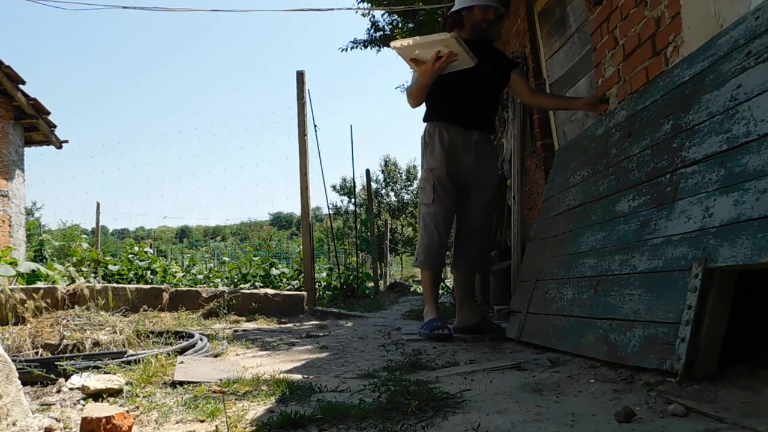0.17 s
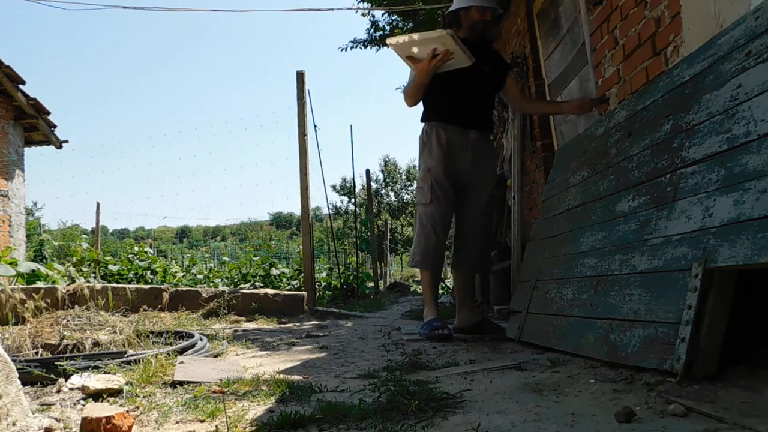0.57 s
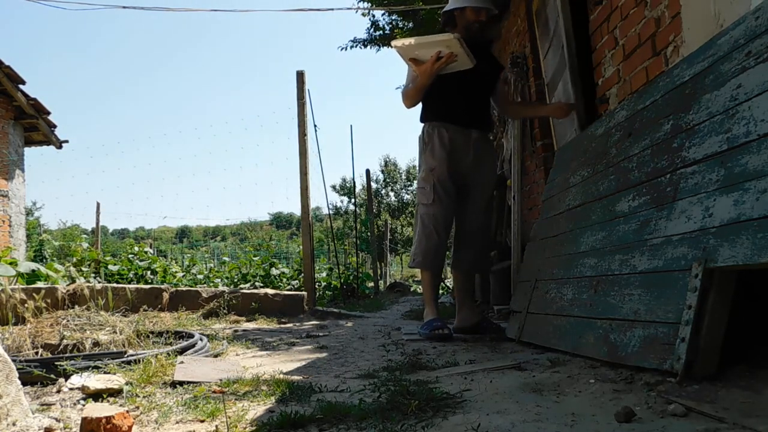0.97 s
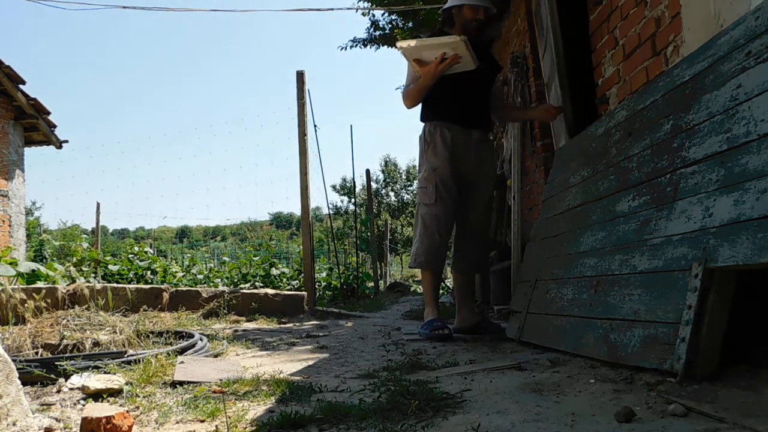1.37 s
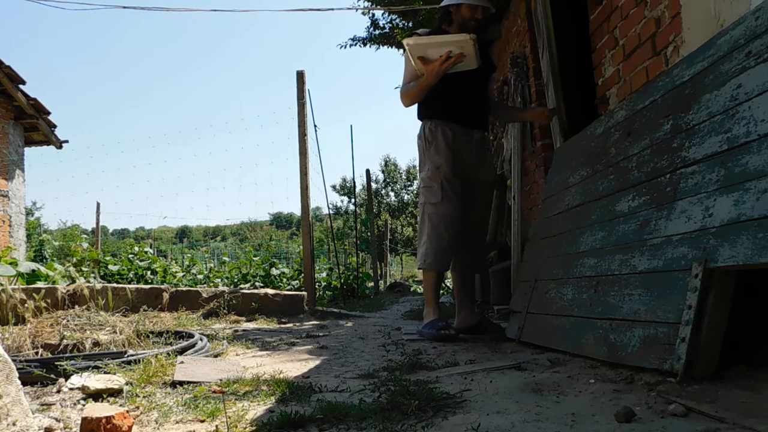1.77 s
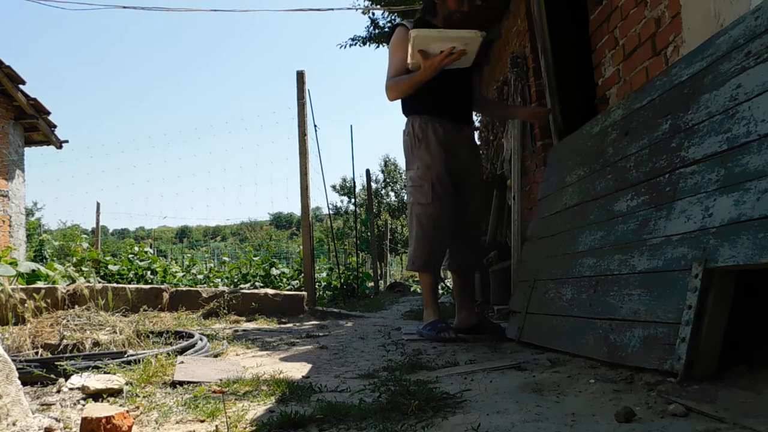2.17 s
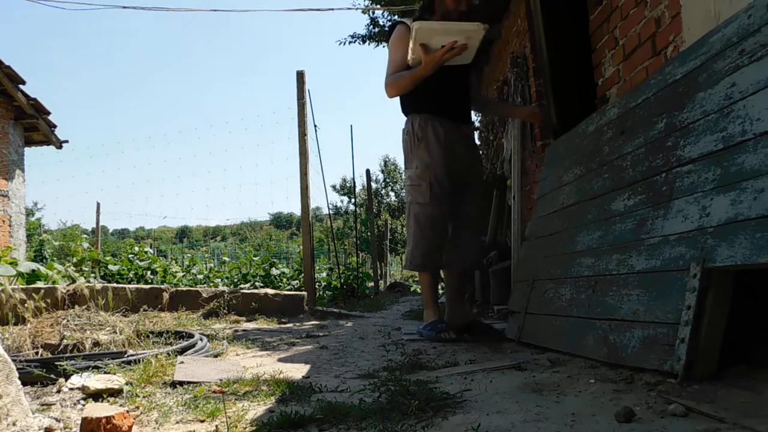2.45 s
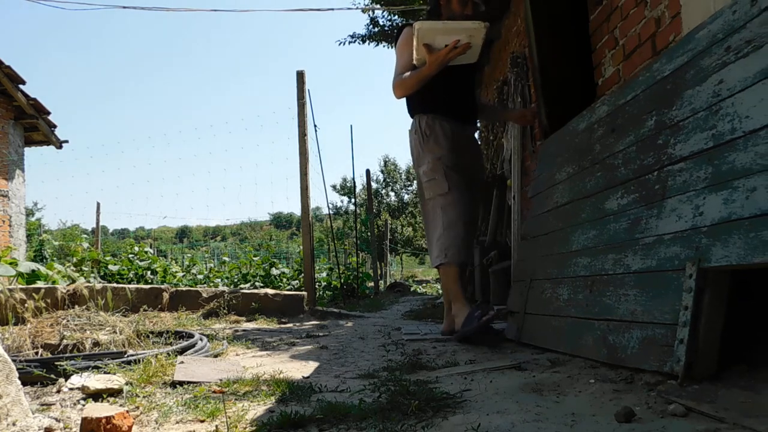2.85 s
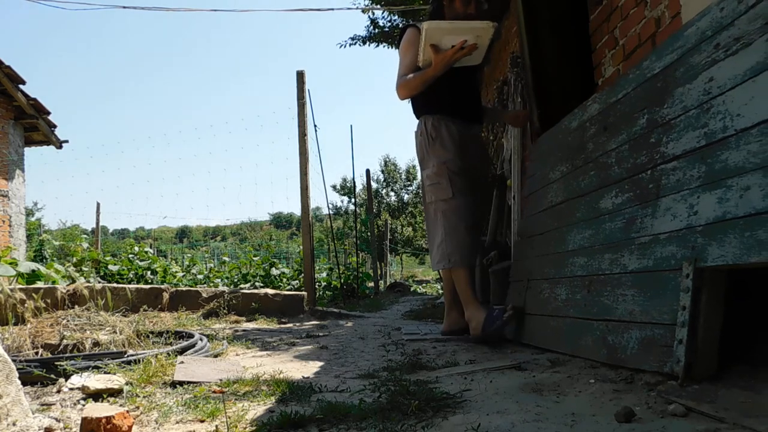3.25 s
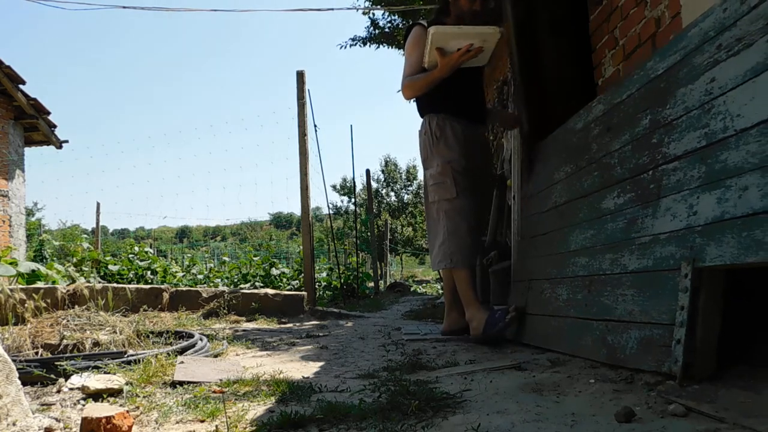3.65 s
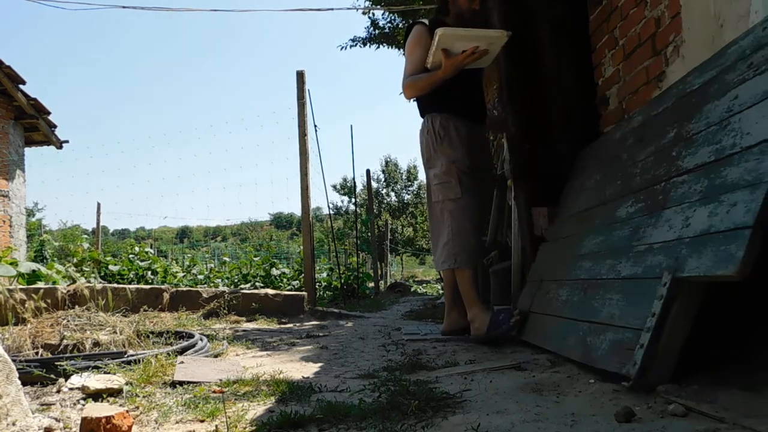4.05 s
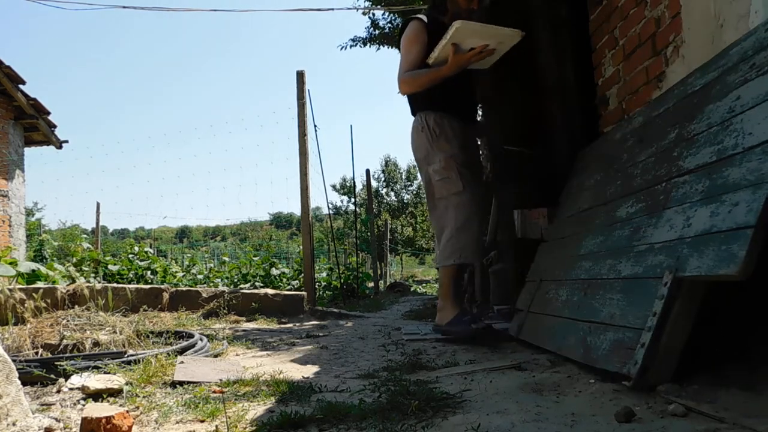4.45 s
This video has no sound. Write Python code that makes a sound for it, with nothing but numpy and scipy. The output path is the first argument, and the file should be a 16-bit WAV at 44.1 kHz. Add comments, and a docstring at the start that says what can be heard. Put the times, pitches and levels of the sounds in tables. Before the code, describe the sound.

Small wooden and metal ticks from a shed door latch, with short squeaks, under thin high cicadas; then a plank panel knocks loudly and clatters to rest.

```python
"""Small ticks of a shed door's latch and hinge, worked by a hand a few metres off, under very high cicadas;
two dull low thuds, perhaps footsteps, fall among the first. Then a leaning plank panel is dragged, knocked and
bounces to rest. Impact bursts drive plank and latch modes; squeaks are gliding tones; rubbing and brushes are
filtered grit. Cicadas are noise patterns repeated every stroke. A soft noise hush lies under all, and the yard
returns a short, dull tail of the near sounds.
"""
import sys
import numpy as np
from scipy import signal
from scipy.fft import rfft, irfft, next_fast_len
from scipy.io import wavfile
from scipy.ndimage import uniform_filter1d

SR = 44100
rng = np.random.default_rng(int(sys.argv[2]) if len(sys.argv) > 2 else 0)


def store_pcm(level_fs):
    """Save levels as 16-bit WAV."""
    pcm = np.round(np.clip(level_fs, -1, 1) * 32767).astype(np.int16)
    wavfile.write(sys.argv[1], SR, np.atleast_2d(pcm).T)


N = 202605
T = np.arange(N) / SR
SIZE = next_fast_len(N + SR // 2)  # room for the yard tail


def grid(size):
    """FFT bin frequencies in Hz, nudged off zero for safe division and logs."""
    return np.fft.rfftfreq(size, 1 / SR) + 1e-3


HZ = grid(SIZE)


def undb(db):
    """Decibels to gain."""
    return 10 ** (np.asarray(db) / 20)


def unit(x):
    """Scale to rms 1."""
    return x / np.sqrt(np.mean(x ** 2))


def through(x, response):
    """Filter by a frequency response given on HZ."""
    return irfft(rfft(x, SIZE) * response, SIZE)[..., :N]


def colour(points, at=HZ):
    """Gain from (Hz, dB) points, interpolated over log frequency."""
    hz, db = np.transpose(points)
    return undb(np.interp(np.log(at), np.log(hz), db))


def modes(table, hz=HZ):
    """Causal response of resonances (Hz, width Hz, dB) with alternating sign."""
    total = 0
    for k, (f, width, db) in enumerate(table):
        resonance = 1j * hz * width / (f * f - hz * hz + 1j * hz * width)
        total = total + (-1) ** k * undb(db) * resonance
    return total


def curve(rows, off_db=-120):
    """Gain from (s, dB) rows, practically silent outside them."""
    s, db = np.transpose(rows)
    return undb(np.interp(T, s, db, left=off_db, right=off_db))


def walk(rate_hz):
    """Random levels, a new one every 1 / rate_hz s, joined by ramps; spread near 1."""
    k = int(SR / rate_hz)
    steps = np.repeat(rng.standard_normal(N // k + 1), k)
    return 1.2 * uniform_filter1d(steps, k)[:N]


def grit(shape, scatter_db):
    """Noise whose samples differ widely in size, like many tiny impacts."""
    return rng.standard_normal(shape) * undb(scatter_db * rng.exponential(size=shape))


def pan(db):
    """Left and right gains, db apart (left minus right)."""
    return undb([[db / 2], [-db / 2]])


def add(out, s, sound, db, pan_db=0.):
    """Lay a short sound into the stereo track; level is twice its loudest 3 ms rms."""
    i = int(s * SR)
    sound = sound[..., :N - i]
    peak = np.sqrt(4 * uniform_filter1d(sound ** 2, size=130).max())
    out[:, i:i + sound.shape[-1]] += sound * undb(db) / peak * pan(pan_db)


def burst(hits, rise_s, length_s, first_db):
    """Spectrum of a run of small impacts that swells and dies, with one sharp impact 1 ms in."""
    t = np.arange(len(hits)) / SR
    push = hits * (1 - np.exp(-t / max(rise_s, 1e-4))) ** 2 * np.exp(-t / max(length_s, 2e-4))
    push = push / np.sqrt(np.sum(push ** 2))
    push[44] += undb(first_db)
    return rfft(push)


# Two dull low thuds, perhaps footsteps, then blows on the planks. Each row: time in seconds, level in dB,
# centre of the modes reached in Hz, contact rise in seconds, crack in dB, low flex in dB.
IMPACTS = [(.19, -51.5, 148, 0.021, -55, -28), (.248, -69, 160, 0.0089, -58, -24),
           (3.473, -43.5, 880, 0.0043, -34, -3), (3.5, -34.5, 930, 0.0073, -18, 2.5),
           (3.53, -27, 880, 0.0014, -44, -10.5), (3.552, -32.5, 940, 0.0013, -24, -4),
           (3.597, -27, 1880, 0.0012, -14, -16), (3.604, -30.5, 650, 0.002, -17.5, -8),
           (3.82, -12.5, 1000, 0.0024, -28.5, 1.5), (3.835, -9.5, 786, 0.0016, -33, -5),
           (3.855, -21.5, 640, 0.0054, -20.5, -14), (3.866, -15, 1030, 0.0009, -42, 0.5),
           (3.873, -23.5, 756, 0.0024, -25.5, -15), (3.954, -31.5, 1260, 0.014, 9, -17),
           (3.971, -11.5, 1435, 0.00064, -25, -17), (3.986, -30, 1310, 0.0013, 3, -8),
           (4.006, -23.5, 865, 0.0047, -26, -8), (4.028, -27.5, 920, 0.0045, -14.5, 10),
           (4.099, -34.5, 2520, 0.0019, 11, 1), (4.11, -25, 770, 0.0034, -26, 1),
           (4.134, -26.5, 720, 0.0014, -45, 2.5), (4.15, -39, 254, 0.0074, -68.5, -8),
           (4.16, -50, 530, 0.0069, -9, 5), (4.189, -30, 760, 0.0016, -27, 1.5),
           (4.221, -55, 293, .008, -45, 0), (4.276, -37, 764, 0.0036, -33, 4.5),
           (4.327, -63, 235, 0.0051, -54, -10)]
# Plank modes. Each row: frequency in Hz, width in Hz, strength in dB.
PANEL = [(170.2, 37, -11), (218, 26, -3.5), (257, 80, -3), (312, 37, 1), (344, 32, -3.5), (463, 51, 5.5),
         (552.5, 27, 7.5), (565, 54, 6.5), (647, 72, 5.5), (711, 54, 1), (819, 64, 1.5), (924, 49, -0.5),
         (944, 68, 1), (958, 150, 2), (1126, 63, 4), (1151, 81, 2), (1310, 89, 0.5), (1400, 76, 0.5),
         (1555, 130, 5), (1633, 160, 6), (1890, 470, -4.5), (1986, 46, 2), (2310, 470, -5.5),
         (2730, 120, 1), (2830, 1070, -10), (3650, 120, 1.5), (3940, 170, -8)]
# Splintering, also the rubbing hiss. Each row: frequency in Hz, gain in dB.
CRACK = [(300, -62), (1500, -10), (3000, 0.5), (4000, -0.5), (5000, -7), (7000, -7.5), (9000, -14),
         (11500, -18.5), (14000, -21), (17000, -14)]
SPOT_DB = 1.5  # scatter of mode strength from one struck spot to the next
FLEX_HZ = 380  # the whole panel flexes below this
JUDDER_S, JUDDER_PER_RISE = 0.0019, 2.56  # a softer contact judders longer
FIRST_DB, FIRST_DB_PER_S = -1, -2200.  # and its first impact is weaker


def thuds_and_panel():
    """Each impact judders through the plank modes; its spot and hardness choose which answer."""
    out, hz = np.zeros((2, N)), grid(8192)
    crack = colour(CRACK, hz)
    spots = SPOT_DB * rng.standard_normal((len(IMPACTS), len(PANEL)))
    all_hits = grit((len(IMPACTS), 3, 8192), 4.72)
    for (s, db, centre_hz, rise_s, crack_db, flex_db), spot, hits in zip(IMPACTS, spots, all_hits):
        length_s = JUDDER_S + JUDDER_PER_RISE * rise_s
        first_db = FIRST_DB + FIRST_DB_PER_S * rise_s
        wood, left, right = (burst(h, rise_s, length_s, first_db) for h in hits)
        planks = modes([(f, w, gain_db + d) for (f, w, gain_db), d in zip(PANEL, spot)], hz)
        reach = modes([(centre_hz, 0.78 * centre_hz, 0)], hz) ** 2
        flex = undb(flex_db) / (1 + 1j * hz / FLEX_HZ) ** 2
        body = planks * (reach + undb(-16.0) + flex)
        # splinters and grit crack all along the edge, so each ear hears its own
        splinters = undb(crack_db) * crack * np.array([left, right])
        add(out, s - .001, irfft(wood * body + splinters), db, 1.)
    return out


FAINT_TICKS = 12  # count
FAINT_DB, FAINT_SPREAD_DB, FAINT_HZ, FAINT_SNAP_DB = -45, 2., 1140, -3


def faint_ticks():
    """Rows like TICKS at chance moments, thickest where there is rubbing."""
    busy = np.cumsum(np.minimum(sum(curve(rows) for rows in RUB), undb(-61.5)))
    when, size, pitch = rng.random((FAINT_TICKS, 3)).T
    s = np.interp(when, busy / busy[-1], T)
    db = FAINT_DB + FAINT_SPREAD_DB * (2 * size - 1)
    ring_hz = FAINT_HZ * 2 ** (pitch - .4)
    return [(a, b, c, FAINT_SNAP_DB) for a, b, c in zip(s, db, ring_hz)]


# Latch and door ticks that stand out. Each row: time in seconds, level in dB, ring in Hz, snap in dB.
TICKS = [(0.028, -35.5, 1890, -31), (0.03, -29, 840, -10), (0.174, -43, 940, -14), (0.217, -45.5, 895, -21),
         (0.231, -35, 2160, -26), (0.375, -41, 1830, -28), (0.395, -41, 2150, -23),
         (0.652, -39, 1880, -12.5), (0.692, -38.5, 6450, 0), (0.732, -40.5, 1000, -9),
         (0.899, -45.5, 890, -24), (0.931, -30.5, 5170, 1), (1.641, -34.5, 1060, -7),
         (1.726, -36.5, 2400, -10), (1.73, -40, 1190, -24), (1.753, -29, 2400, 12), (1.819, -43, 1400, -17),
         (1.879, -42.5, 1300, -23), (1.964, -41, 1170, -21), (2.103, -36.5, 2050, -18),
         (2.167, -29, 3050, 2), (2.193, -32.5, 1440, -8.5), (2.22, -33, 1240, -39), (2.275, -43, 1290, -13),
         (2.394, -23.5, 2600, -10.5), (2.4, -25.5, 1440, -5), (2.643, -39, 2880, -2),
         (2.841, -43, 2820, -18), (3.03, -45, 1550, -29), (4.187, -52, 8000, -8), (4.276, -51, 9500, -2),
         (4.317, -56, 9500, -20), (4.425, -46, 9000, 0), (4.447, -53, 9500, -25), (4.482, -44.5, 8400, -10),
         (4.503, -48, 8950, -22), (4.522, -49, 6200, -20), (4.559, -55, 10000, -15)]
# Tick edge. Each row: frequency in Hz, gain in dB.
SNAP = [(300, -28), (1200, -14.5), (2500, -2.5), (4000, -1), (6000, 1), (8500, -21.5), (12000, -31),
        (17000, -37)]
# Clinks of the iron latch. Each row: time in seconds, level in dB.
CLINKS = [(0.45, -41.5), (0.4726, -20), (0.492, -36)]
# Latch modes. Each row: frequency in Hz, width in Hz, strength in dB.
LATCH = [(2084, 160, 5), (2313, 9.8, 3.5), (3400, 1400, -14), (5100, 610, -2.5), (7200, 330, -13)]
TICK_RISE_S, TICK_CYCLES, TICK_FIRST_DB = 0.00089, 13, -6  # rattle decays over this many ring cycles
SNAP_RISE_S, SNAP_S, SNAP_FIRST_DB = .0004, .0013, 0.  # the snap is over sooner than the ring
CLINK_RISE_S, CLINK_S, CLINK_FIRST_DB = 0.0049, 0.0027, -23.0
TICK_PAN_DB = -1


def ticks():
    """Impacts excite the part's own ring and a broad snap; the latch rings in its own modes."""
    out, hz = np.zeros((2, N)), grid(4096)
    rows = TICKS + faint_ticks()
    for (s, db, ring_hz, snap_db), hits in zip(rows, grit((len(rows), 4096), 3.94)):
        rattle = burst(hits, TICK_RISE_S, TICK_CYCLES / ring_hz, TICK_FIRST_DB)
        ring = rattle * modes([(ring_hz, 0.9 * ring_hz, 0)], hz) ** 2
        snap = burst(hits, SNAP_RISE_S, SNAP_S, SNAP_FIRST_DB) * colour(SNAP, hz)
        add(out, s - .001, irfft(ring + undb(snap_db) * snap), db, TICK_PAN_DB)
    latch = modes(LATCH, grid(16384))
    for (s, db), hits in zip(CLINKS, grit((len(CLINKS), 16384), 2.)):
        clink = burst(hits, CLINK_RISE_S, CLINK_S, CLINK_FIRST_DB) * latch
        add(out, s - .001, irfft(clink), db, -1.)
    return out


# Hinge and wood squeaks, the first followed by its faint ringing echo. Each row: start in seconds,
# length in seconds, start in Hz, end in Hz, level in dB, third harmonic in dB, roughness 0-1.
SQUEAKS = [(0.613, 0.02, 3430, 3510, -18, -44, 0.09), (.63, 0.1, 3500, 3485, -49.5, -55, 0.8),
           (2.036, 0.053, 2580, 1994, -33.5, -40, 0.9), (2.042, 0.026, 3230, 3090, -41.5, -38, 0.7),
           (2.063, 0.045, 2225, 2236, -44, -40, 0.3), (3.685, 0.015, 1178, 1267, -31.5, -7, 0.39),
           (4.326, 0.014, 1506, 1460, -39.5, -35, 0.3)]
SECOND_DB = -23.5  # second harmonic


def squeaks():
    """Fast stick-slip, and one faint echo: a short gliding tone with overtones, swelling and dying."""
    out = np.zeros((2, N))
    noises = rng.standard_normal((len(SQUEAKS), 8192))
    for (s, length_s, hz0, hz1, db, third_db, rough), noise in zip(SQUEAKS, noises):
        u = np.linspace(0, 1, int(length_s * SR))
        phase = 2 * np.pi * np.cumsum(hz0 + (hz1 - hz0) * u) / SR
        tone = np.sin(phase) + undb(SECOND_DB) * np.sin(2 * phase) + undb(third_db) * np.sin(3 * phase)
        slip = 1 + rough * unit(uniform_filter1d(noise, size=60))[:len(u)]
        swell = np.sin(np.pi * u ** 1.18) ** 0.77
        add(out, s, tone * slip * swell, db, -.5)
    return out


# Rubbing of door, panel and feet, in three bouts. Each row: time in seconds, level in dB.
RUB = [
    [(0, -61.5), (.15, -65), (.39, -57), (.55, -65), (.7, -57), (1.05, -75.5)],
    [(1.45, -70.5), (1.7, -61.5), (1.95, -73), (2.1, -56), (2.25, -68), (2.55, -59.5), (3.0, -64),
     (3.3, -71.5)],
    [(3.4, -64), (3.5, -53.5), (3.65, -53.5), (3.81, -64.5), (3.9, -45.5), (4.03, -33), (4.1, -52.5),
     (4.3, -62), (4.59, -74.5)],
]
# Rubbing body. Each row: frequency in Hz, width in Hz, strength in dB.
RUB_BODY = [(580, 470, 3), (1285, 1290, 6), (2210, 3400, -1.5), (4030, 3200, -7)]
RUB_HISS_DB = -9.5  # dry hiss against the dull body


def rubbing():
    """Uneven grit dragged over wood and dry ground: a dull body and a dry hiss."""
    drag = grit(N, 2.) * undb(3 * walk(35))
    body = unit(through(drag, modes(RUB_BODY)))
    hiss = unit(through(drag, colour(CRACK)))
    return (body + undb(RUB_HISS_DB) * hiss) * sum(curve(rows) for rows in RUB)


# Soft brushes of cloth, hand, sole and dragged edge. Each row: start in seconds, length in seconds,
# level in dB, centre in Hz.
BRUSHES = [(1.576, 0.047, -41.5, 2160), (1.723, 0.06, -42.5, 2230), (2.054, 0.12, -51, 2980),
           (2.186, 0.08, -41.5, 2250), (2.509, 0.043, -47, 1800), (2.573, 0.11, -44, 1880),
           (2.787, 0.096, -45, 2150), (2.869, 0.07, -52, 2900), (3.104, 0.078, -46.5, 4200),
           (3.5, 0.11, -47, 3440), (3.989, 0.065, -38, 3150)]


def brushes():
    """Smooth swells of fine, broad hiss."""
    out, hz = np.zeros((2, N)), grid(4096)
    for (s, length_s, db, centre_hz), noise in zip(BRUSHES, grit((len(BRUSHES), 2, 4096), 1.5)):
        hiss = irfft(rfft(noise) * modes([(centre_hz, 0.45 * centre_hz, 0)], hz))
        hiss = hiss[:, :int(length_s * SR)]
        add(out, s, hiss * np.hanning(hiss.shape[-1]), db)
    return out


YARD_T60_S, YARD_RISE_S, YARD_DB = 0.18, 0.0081, -7
YARD_DULL_HZ, YARD_WIDE_HZ = 3780, 760
YARD_THIN_HZ = 352  # the open yard returns little bass


def yard(x):
    """Walls and ground return a short, duller tail; its treble differs between the ears."""
    t = np.arange(SR // 2) / SR
    decay = np.exp(-np.log(1000) * t / YARD_T60_S) * np.minimum(t / YARD_RISE_S, 1)
    tail = rng.standard_normal((2, len(t))) * decay
    mid, side = rfft(tail / np.sqrt(np.sum(tail ** 2, axis=1, keepdims=True)), SIZE)
    side = side * 1j * HZ / (YARD_WIDE_HZ + 1j * HZ)
    tone = undb(YARD_DB) / (1 + 1j * HZ / YARD_DULL_HZ) ** 2 / (1 - 1j * YARD_THIN_HZ / HZ)
    return through(x, tone * np.array([mid + side, mid - side]))


# Near cicadas. Each row: stroke rate in Hz, clicks a stroke, memory 0-1, share of the second click 0-1,
# left minus right in dB.
CICADAS = [(166.45, 2, .985, .4, 2.5), (282., 1, .96, 0., 1.)]
# Each cicada's song. Each row: four swell times in seconds (rise and fade may overlap), level in dB.
SWELLS = [(-.3, .4, 1.35, 3.4, -58), (1.7, 2.693, 2.3, 7.2, -56)]
# Strongest wing resonances, one list an insect. Each row: frequency in Hz, width in Hz, strength in dB.
SONGS = [
    [(13400, 470, 14), (15900, 500, 5), (15600, 400, 11)],
    [(12400, 300, 8), (12400, 600, 8), (15000, 300, -14)],
]
# Far cicadas. Each row: time in seconds, level in dB.
CHORUS = [(0, -49), (.4, -51), (1.3, -54.5), (1.9, -51.5), (2.3, -56), (3.8, -53), (4.2, -57), (4.45, -53),
          (4.6, -55)]
# Cicada colour. Each row: frequency in Hz, gain in dB.
WING = [(6180, -70), (10500, -30), (11600, -13), (13200, 1.5), (14000, 6), (15100, -1), (16000, 5.5)]
SWELL_DEPTH_DB = 26


def cicadas():
    """Each insect repeats nearly the same click pattern every stroke; far ones blur into a hiss."""
    wing = colour(WING)
    far = unit(through(rng.standard_normal((2, N)), wing))
    out = far * curve(CHORUS) * undb(1.2 * walk(12))
    for (rate_hz, clicks, memory, twin, pan_db), (*times, db), peaks in zip(CICADAS, SWELLS, SONGS):
        swell = undb(db - SWELL_DEPTH_DB * np.interp(T, times, [1, 0, 0, 1]))
        half = np.exp(-1j * np.pi * HZ / rate_hz)  # delay of half a stroke
        repeat = (1 + twin * half) / (1 - memory * half ** 2)
        pattern = through(rng.standard_normal((2, N)), repeat)
        stroke = 2 * np.pi * rate_hz * T
        beat = np.exp(1.3 * np.cos(clicks * stroke) + 0.093 * np.cos(stroke))
        song = (pattern[0] + 0.72 * pattern) * beat  # partly shared by both ears
        resonance = 0.99 + sum(np.abs(modes([peak])) for peak in peaks)
        out += unit(through(song, wing * resonance)) * swell * pan(pan_db)
    return out


# Hush colour. Each row: frequency in Hz, gain in dB.
HUSH = [(12, -22), (20, -8), (114, -16), (200, -15.5), (268, -12.5), (291, -14), (324, -8), (360, -10),
        (1110, -5), (1940, -8.5), (2340, -10), (8030, -23.5), (12000, -25.5), (15600, -62), (22000, -120)]
# Hush likeness of left and right. Each row: frequency in Hz, likeness 0-1.
LIKE = [(30, 1), (130, 0.6), (600, 0.5), (3000, 0.16), (12000, 0.)]
HUSH_DB = -59


def hush():
    """Leaves, far road and air: alike left and right in the bass, gently swelling."""
    hz, like = np.transpose(LIKE)
    like = np.clip(np.interp(np.log(HZ), np.log(hz), like), 0, 1)
    mid = through(rng.standard_normal(N), colour(HUSH) * np.sqrt(1 + like))
    side = through(rng.standard_normal(N), colour(HUSH) * np.sqrt(1 - like))
    level = undb(HUSH_DB + 0.32 * walk(0.37) + 0.33 * walk(2.1))
    return unit(np.array([mid + side, mid - side])) * level


THIN_HZ = 130  # thin boards radiate little bass
SMALL_ECHO_DB = -8.  # echo of ticks and squeaks against the boards'
LEFT_LAG_S, SHADE_HZ, SHADE_DB = 3.7 / SR, 2480, -3.5  # left ear: later, treble lowered
THUMP_DB, THUMP_HZ = -14, 89  # the ground under the listener


def scene():
    """The door stands to the right, so its sound reaches the left ear a little late and shaded."""
    impacts = thuds_and_panel()
    small = ticks() + squeaks()
    broad = brushes() + impacts + rubbing()
    thin = 1j * HZ / (THIN_HZ + 1j * HZ)
    near = through(small + broad, thin)
    echoed = through(broad + undb(SMALL_ECHO_DB) * small, thin)  # small fittings wake less of the yard
    shade = (SHADE_HZ + 1j * HZ * undb(SHADE_DB)) / (SHADE_HZ + 1j * HZ)
    lag = np.exp(-2j * np.pi * HZ * LEFT_LAG_S)
    direct = np.array([through(near[0], shade * lag), near[1]])
    # the force of each impact shakes the ground
    shake = np.abs(impacts[1]) * rng.standard_normal(N)
    thump = through(shake, undb(THUMP_DB) * modes([(THUMP_HZ, THUMP_HZ, 0)]))
    return direct + thump + yard(echoed.mean(axis=0)) + cicadas() + hush()


TOP_HZ = 15750


def record(dry):
    """A steep elliptic low-pass cuts the top."""
    return signal.sosfilt(signal.ellip(12, .3, 70, TOP_HZ, fs=SR, output="sos"), dry)


dry = scene()
out = record(dry)
store_pcm(out)
```